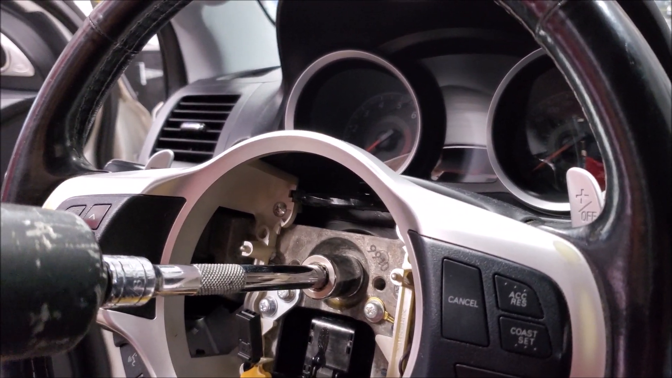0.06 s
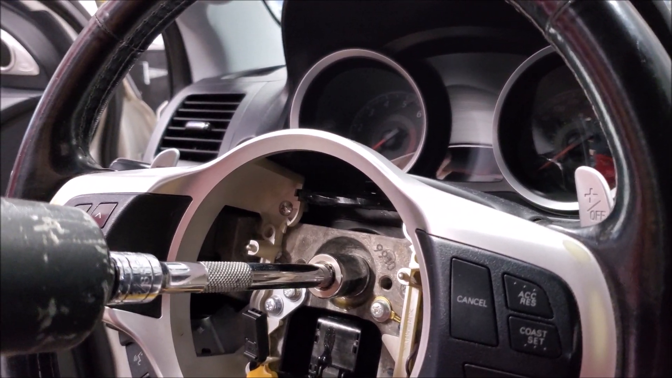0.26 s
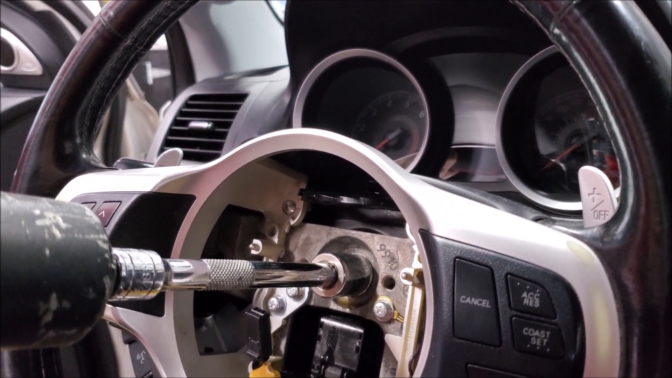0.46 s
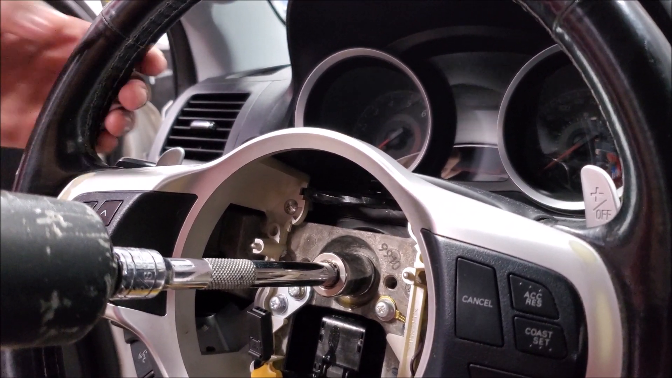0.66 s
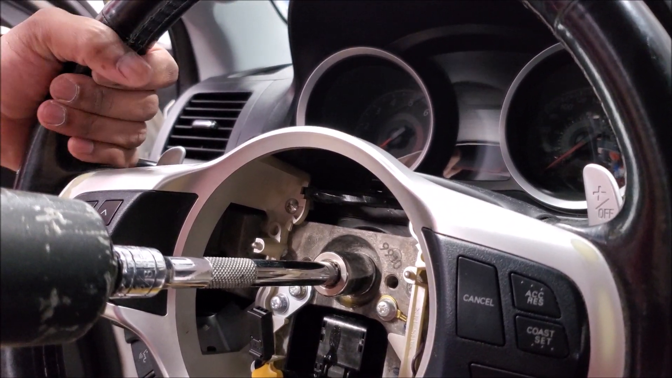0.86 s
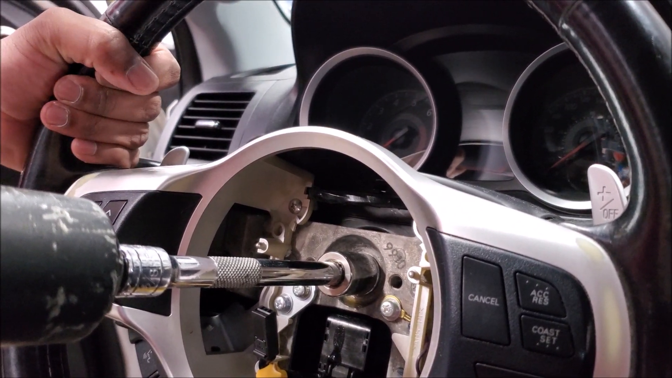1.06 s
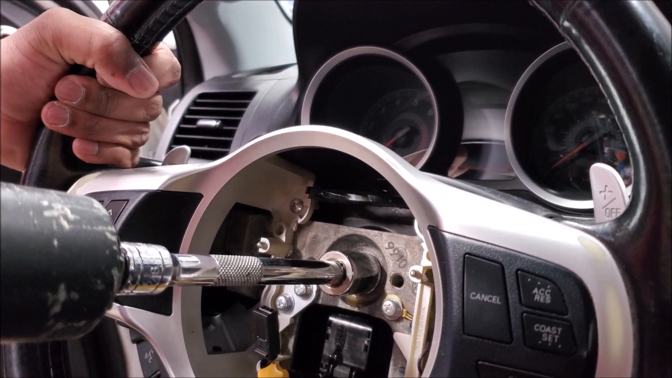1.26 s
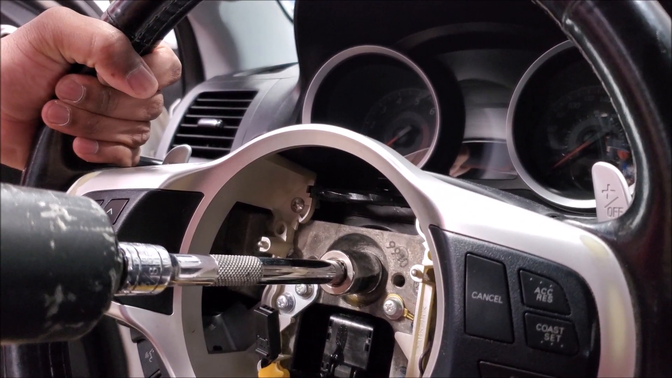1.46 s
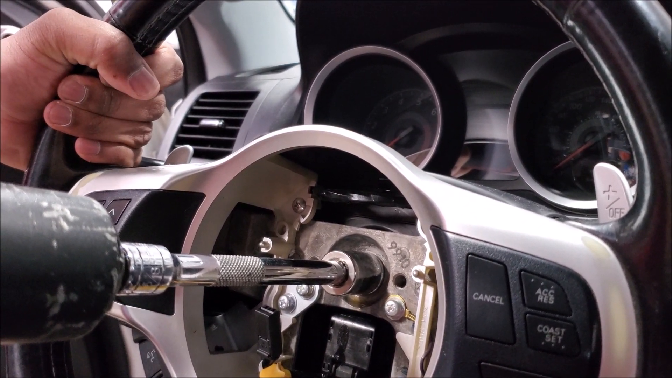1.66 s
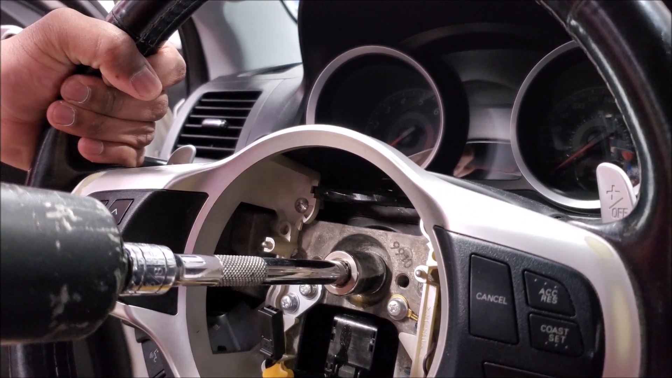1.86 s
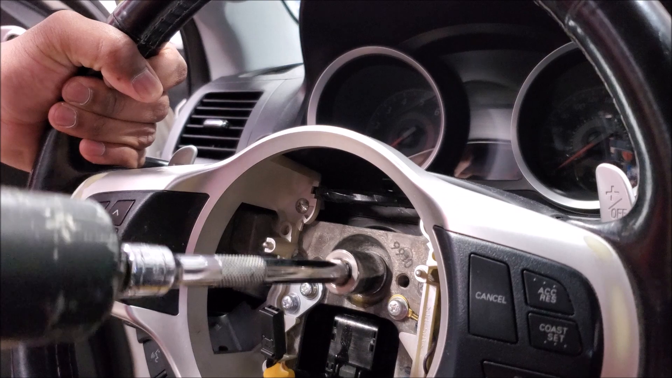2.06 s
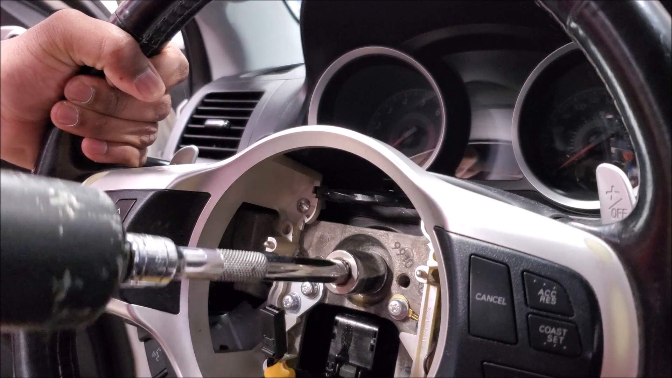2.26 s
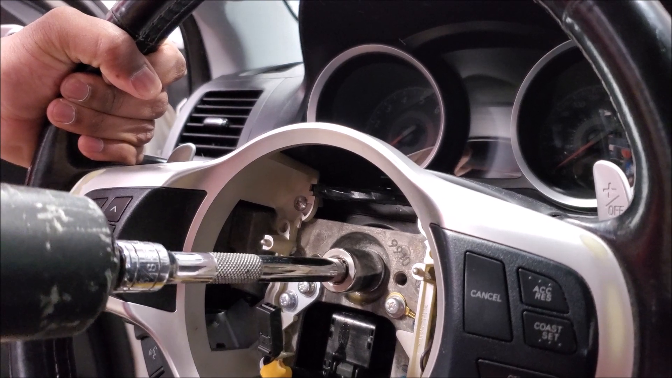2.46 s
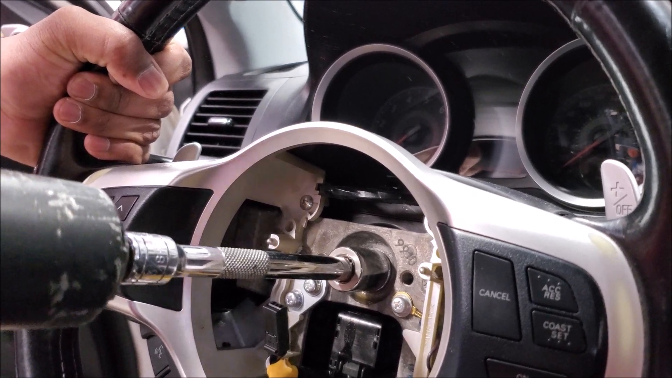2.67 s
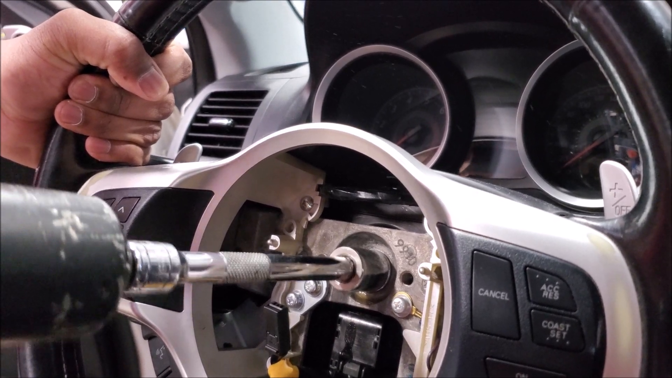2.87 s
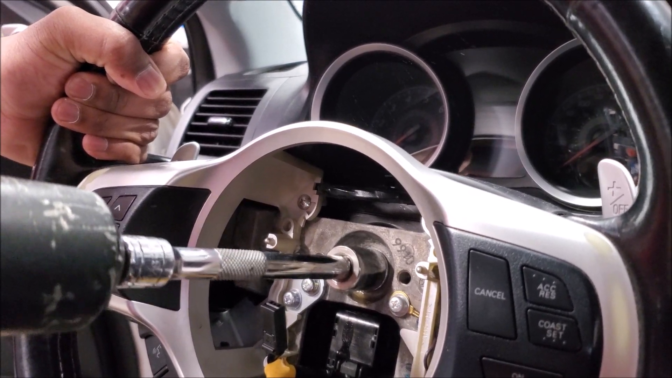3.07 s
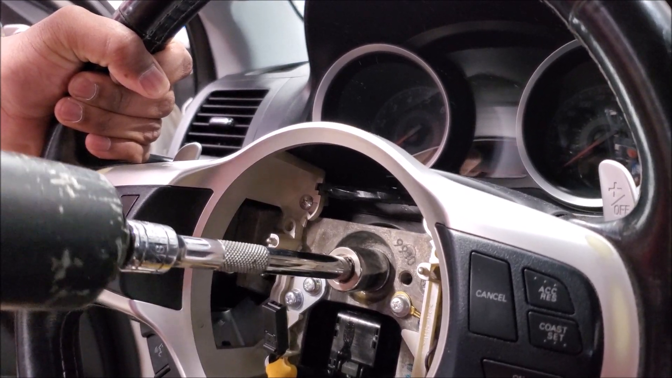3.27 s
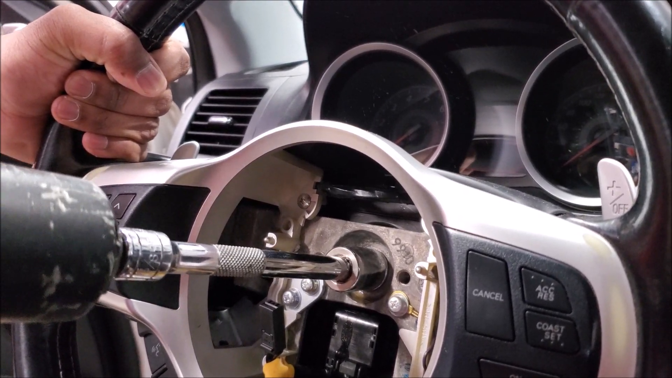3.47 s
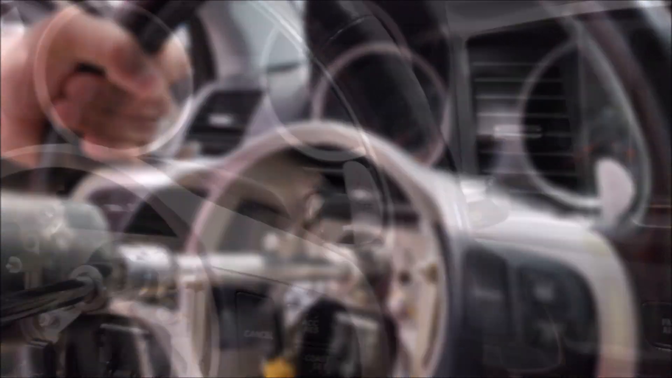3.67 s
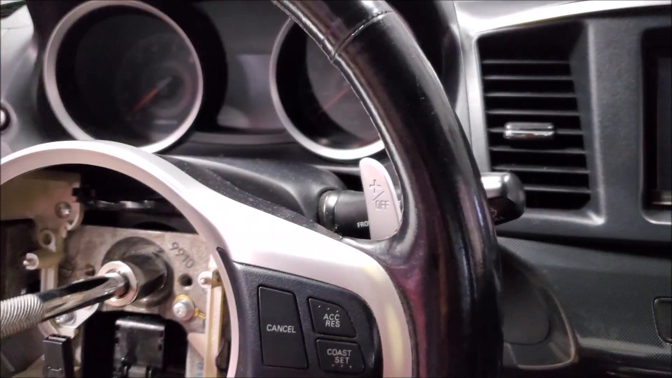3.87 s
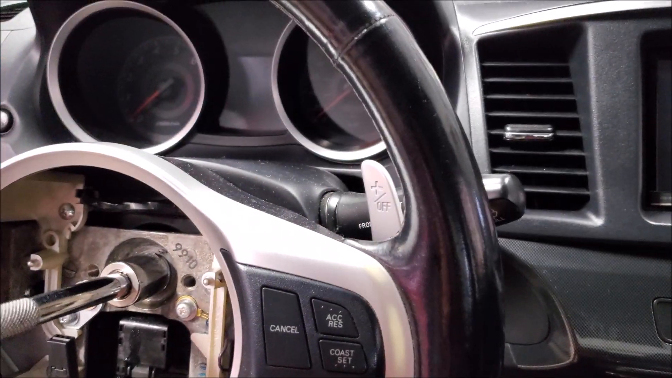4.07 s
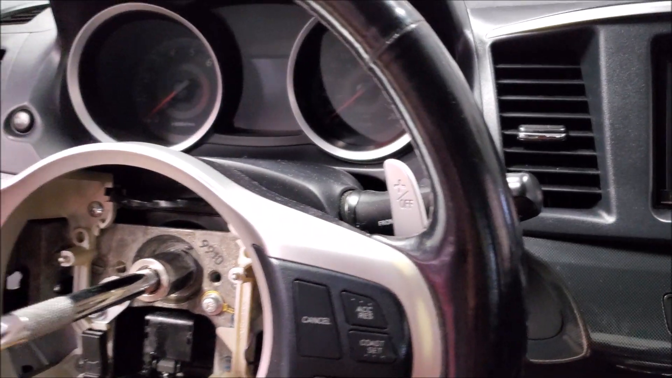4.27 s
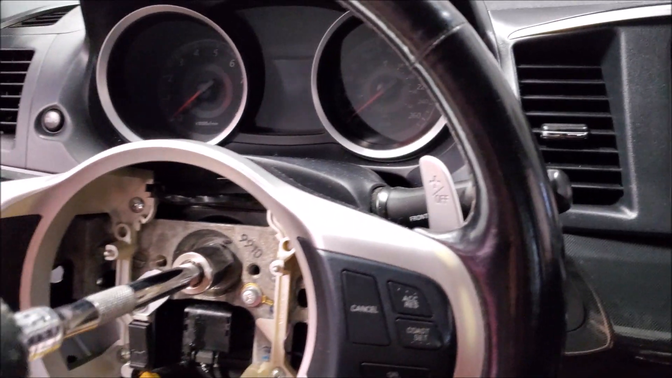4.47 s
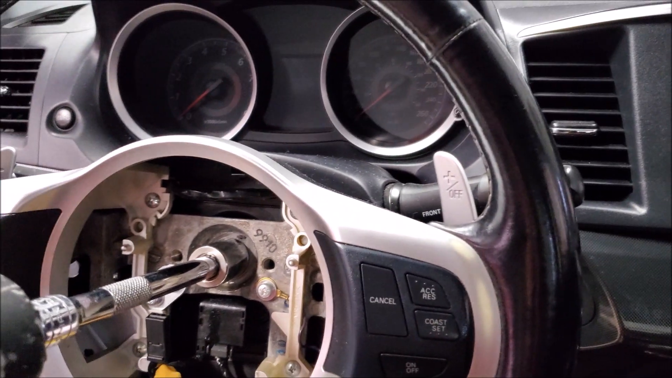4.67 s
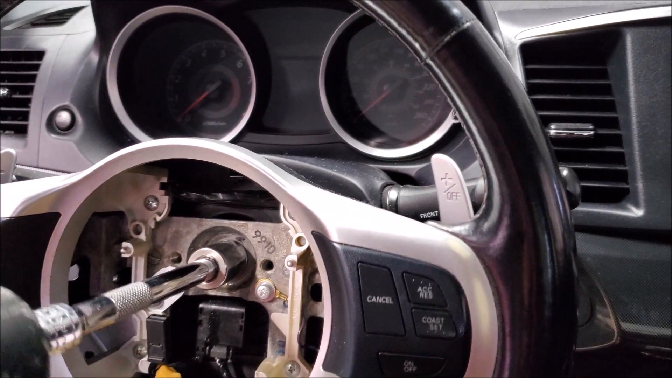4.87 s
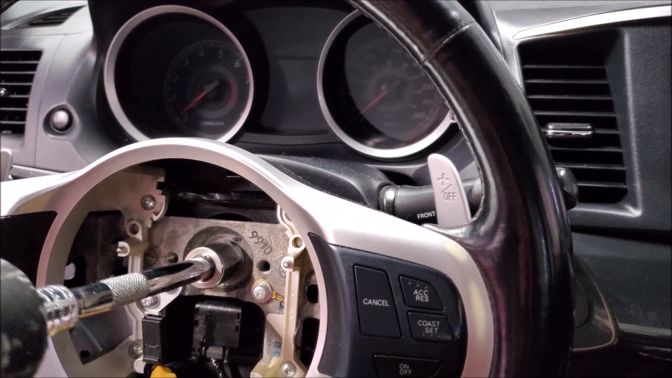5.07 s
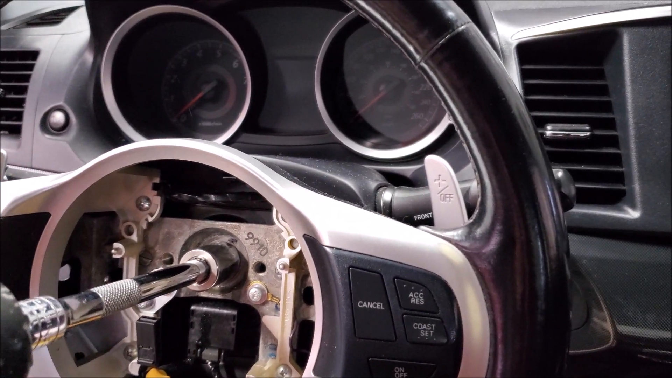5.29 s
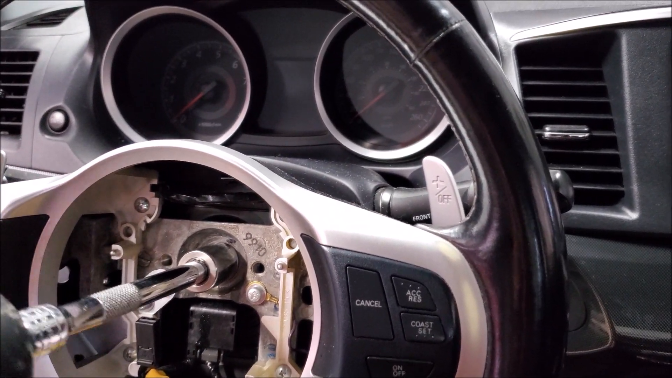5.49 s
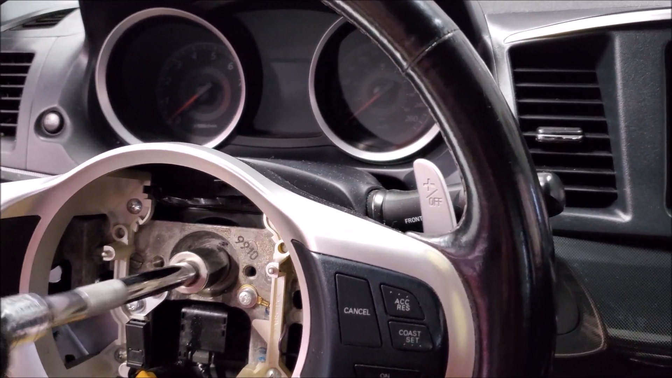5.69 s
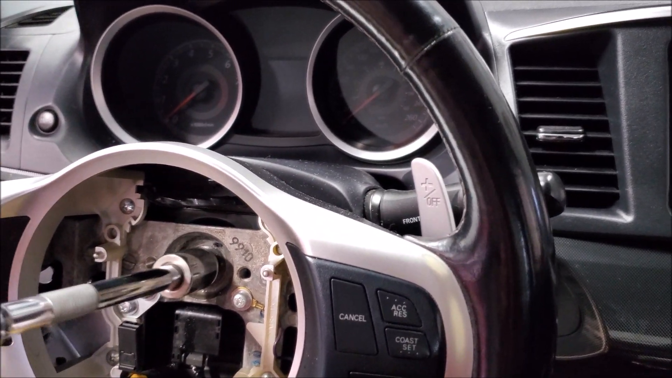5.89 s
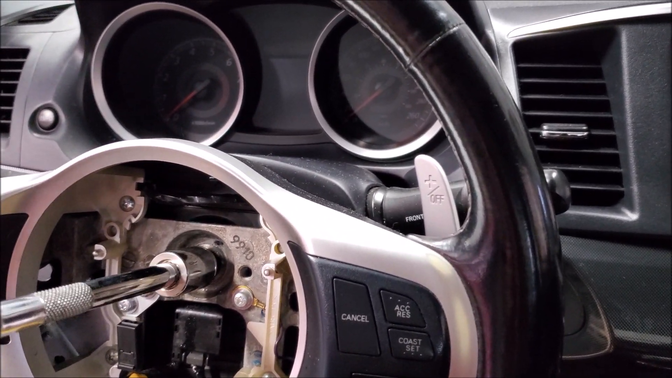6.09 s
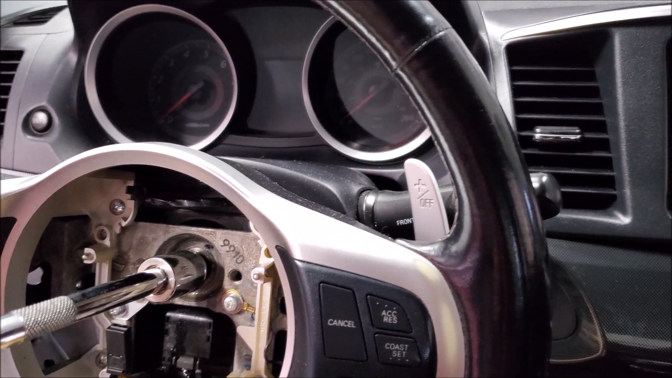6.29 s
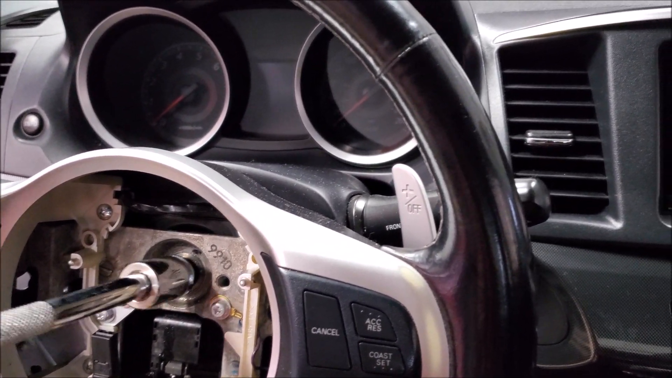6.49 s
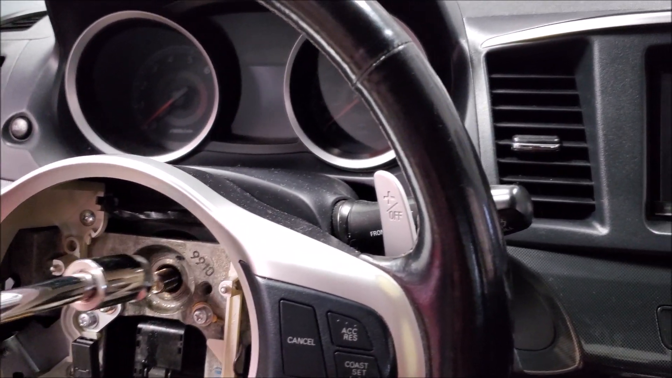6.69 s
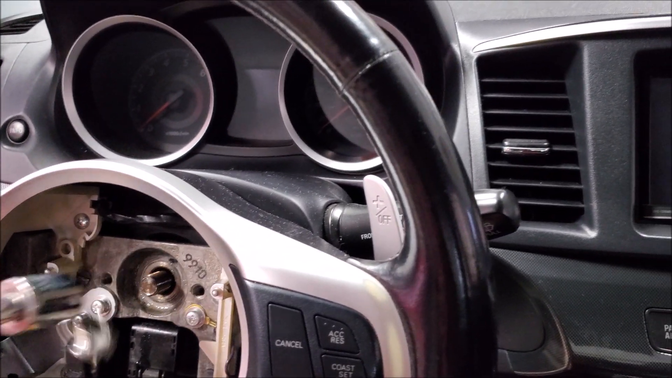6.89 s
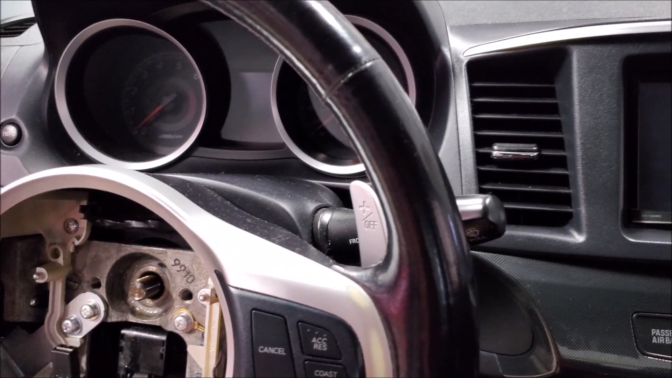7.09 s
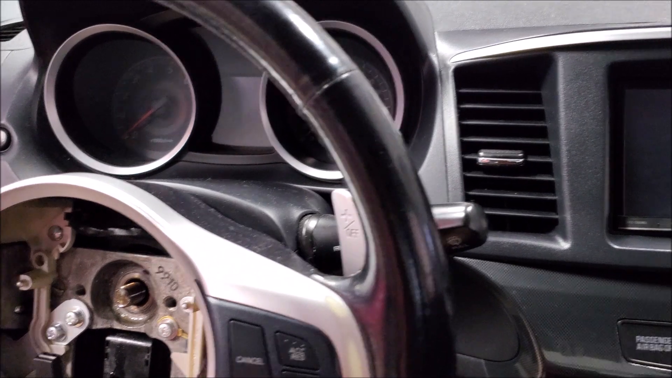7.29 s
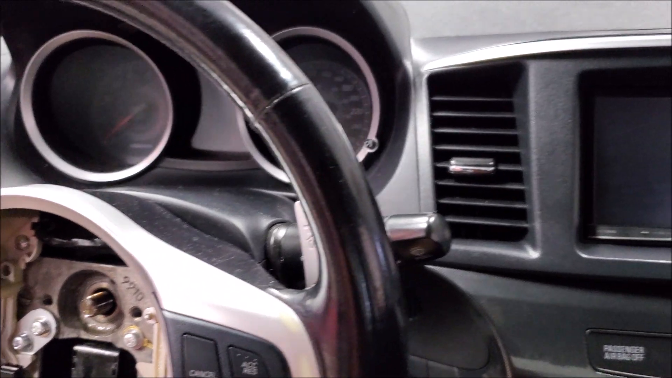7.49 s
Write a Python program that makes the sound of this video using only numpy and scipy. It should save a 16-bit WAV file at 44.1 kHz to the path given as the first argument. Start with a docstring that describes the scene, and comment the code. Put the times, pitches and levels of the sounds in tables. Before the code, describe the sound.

For the first two seconds it is quiet inside a car in a garage: a low hum near 59 hertz throbs about nine times a second, with soft thuds, small taps around 0.2 to 0.65 s and dry hand strokes on leather until 1 s. At 2.1 s an impact wrench bursts in, loud, harsh and close, hammering steel about 44 times a second for 0.2 s. A longer burst runs 2.75-3.2 s, another 3.6-3.85 s, then the throbbing hum returns with faint taps. A very short burst comes at 4.9 s. The last starts at 5.5 s, hammers until 5.7 s, then the gears whir freely to 6.03 s and stop with a clink and low thud. Echo and faint wheel ringing follow bursts. Soft rubbing comes at 6.5 s, clinks and a faint scrape near 7 s, and heavy clunks at 7.3 and 7.5 s.

```python
"""Inside a car in a garage, close to the wheel, a two-port microphone hears an electric impact wrench hammer
a steering wheel nut in five bursts; in the last the nut spins free. Blows and gears are noise and cracks ringing
steel; hub, wheel and nut are decaying sines. A hand rubs (noise strokes) and taps (noise puffs) the wheel, the
socket scrapes off, tool and nut are put down. Behind lie garage echo, two throbbing hum tones and faint noise."""
import sys
import numpy as np
from scipy import signal
from scipy.fft import rfft, irfft
from scipy.io import wavfile
from scipy.ndimage import uniform_filter1d

SR = 44100
rng = np.random.default_rng(int(sys.argv[2]) if len(sys.argv) > 2 else 0)


def int16_out(signal):
    """Quantize to a 16-bit WAV file."""
    q = np.round(np.clip(np.atleast_2d(signal).T, -1, 1) * 32767)
    wavfile.write(sys.argv[1], SR, q.astype(np.int16))


def gain_from_db(level_db):
    """Turn a decibel level (scalar or array-like) into a linear amplitude factor."""
    decades = np.asarray(level_db, float) / 20
    return 10 ** decades


N = 332813
T = np.arange(N) / SR
HZ = np.fft.rfftfreq(8192, 1 / SR)  # grid for filter curves

# Broad colour of tool, socket and hub: f/Hz, relative level/dB
STEEL_COLOUR = [(150, -49), (250, -20.5), (528, -11), (618, -9.5), (761, -2), (922, -4), (1060, -1.5),
                (1980, -8), (2240, -2), (15200, -14.5), (16000, -34)]
# Resonances of the same steel: f/Hz, width/Hz, level/dB over the colour
STEEL_RESONANCES = [(740, 340, 7.3), (1100, 80, 1.3), (1351, 160, 11), (2190, 90, 5.3), (2450, 80, 4.5),
                    (3000, 100, 2.3), (3300, 370, 5.5), (3697, 92, 6.7), (4115, 370, 5), (4600, 160, 5.7),
                    (6440, 150, 1.4)]
# Low, middle and top paths into the steel, each a curve: f/Hz, relative level/dB
STEEL_BANDS = [
    [(1200, 0), (1900, -30)],
    [(1200, -30), (1600, 0), (9000, 0), (10500, -30)],
    [(7800, -30), (9000, 0)],
]
# Steady hammering: first t/s, last t/s, blows per second, blow level/dB before band trims, jaw click level/dB re blow
HAMMERING = [(2.1112, 2.283, 43.1, -10.5, -3.5), (2.7975, 3.22, 43.85, -10, -3.5),
             (3.6493, 3.818, 44.1, -9.5, -5), (4.9341, 5.012, 43.8, -11, -2),
             (5.5505, 5.604, 45.4, -12, 0.5), (5.617, 5.692, 46, -9, -10)]
# Uneven strikes while the hammer catches on and runs out: t/s, level/dB before band trims
UNEVEN_STRIKES = [(2.0775, -10.5), (2.091, -13), (2.0992, -14), (2.2907, -28), (2.7655, -10), (2.779, -9),
                  (3.2212, -15), (3.2276, -16.5), (3.6136, -14.5), (3.623, -8.5), (3.825, -15),
                  (3.8417, -11), (3.8723, -19.5), (4.8939, -16.5), (4.902, -8.5), (4.9146, -14),
                  (5.0183, -11.5), (5.0521, -15.5), (5.0745, -24.5), (5.5083, -22.5), (5.5186, -22.5),
                  (5.527, -12.5), (5.706, -15.5), (6.0422, -29), (6.0534, -28.5), (6.0618, -31),
                  (6.0734, -28), (6.09, -29.5)]
# Motor runs, the last the free spin: start t/s, full rattle t/s, end t/s, gear rattle level/dB before band trims,
# wheel shake level/dB before the kick
MOTOR_RUNS = [(2.064, 2.08, 2.273, -24.5, -41), (2.747, 2.77, 3.214, -25.5, -44),
              (3.599, 3.62, 3.84, -25.5, -42), (4.884, 4.9, 5.016, -26, -41), (5.484, 5.53, 5.7, -28, -41),
              (5.69, 5.712, 6.032, -29.3, -38.5)]
# Gear rattle running down: t/s after the end of a run, level/dB re held rattle
RATTLE_RUNDOWN = [(.02, -10.5), (.045, -23), (.085, -29), (.12, -45)]
# Colour of the wheel's shake: f/Hz, relative level/dB
SHAKE_COLOUR = [(35, -37), (60, -12.5), (129, -1.5), (210, -5), (327, -16.5), (360, -18.5), (500, -14),
                (650, -44), (1100, -120)]
# Modes of the hub: f/Hz, relative level/dB, t60/s
HUB_MODES = [(126, -13, 0.041), (179.7, -11.5, 0.094), (392.5, -16, 0.12), (528, -14, 0.15),
             (762.3, -5.5, 0.042), (867, -4.5, 0.094), (1068, -1.5, 0.057), (1270, -3, 0.071),
             (1540, -9.5, 0.08), (2190, -1, 0.052)]
# Long modes of wheel and column: f/Hz, t60/s, rise/s
WHEEL_MODES = [(161, 3.1, .05), (310, 0.46, .02), (409.2, 1.8, 0.026), (752, .6, 0.1), (926, 1.8, .04)]
# Ringing left when a burst ends: t/s, then one level/dB (before the soft rise) for each wheel mode
WHEEL_RINGS = [(2.301, -68, -54, -69, -36.5, -69), (3.248, -62.5, -43.5, -73, -62, -76),
               (3.88, -61.5, -52.5, -79.5, -47, -89), (5.08, -68, -50.5, -74, -32.5, -74.5),
               (6.13, -59, -76.5, -78, -82, -94)]
# Jolts of the wheel and set-down thuds: t/s, starting level/dB, f/Hz, t60/s
WHEEL_THUDS = [(0.202, -53.5, 212, 0.16), (.64, -52, 210, 0.25), (0.652, -43.5, 124, .2),
               (2.081, -25, 169, 0.059), (2.775, -39.5, 130, .08), (3.62, -40, 149.9, .08),
               (3.845, -19, 125, 0.091), (3.912, -26, 71, 0.21), (4.1, -54, 133.5, 1.4),
               (4.906, -19.5, 139.9, .08), (5.983, -25.5, 120, .12), (6.04, -31, 65, .3),
               (7.288, -19.5, 120, 0.044), (7.288, -28.5, 281, 0.045), (7.299, -32.5, 73.5, 0.31),
               (7.521, -23, 140, 0.053), (7.521, -33, 348, 0.049)]
# Taps and clinks: t/s, level/dB before trim, ring centre f/Hz, dull path level/dB re ring, bright path level/dB re ring
TAP_EVENTS = [(0.227, -57.5, 1770, 4, -15), (0.2623, -55.5, 4640, -6, -10), (0.4953, -50, 3160, -25, -6),
              (0.517, -47.5, 2350, -12.5, -6), (1.1094, -71, 1500, -6, -15), (1.9785, -53, 3600, -19, -5),
              (4.1, -54.5, 4800, -2.5, -9), (4.1544, -70, 2400, 15, -12), (4.3807, -80, 1525, 27.5, -10),
              (4.7494, -80, 1750, 26, -10), (6.1054, -32, 2157, -16, -27), (6.1244, -43, 2190, -22, -26),
              (6.445, -67, 3545, -10, -23), (6.5889, -66, 3050, -15, -21), (6.8694, -67, 3040, -19, -30),
              (6.9316, -44, 2830, -19, -3.5), (6.9566, -37.5, 3610, -9, -2.5),
              (7.0324, -21.5, 1800, -4.5, -19.5), (7.2876, -29.5, 1525, 6, -22),
              (7.5215, -45, 1650, 8, -28)]
# Nut and socket touching down: t/s, level/dB added to that of each mode
CLANK_EVENTS = [(7.0324, -29), (7.2873, -41), (7.5215, -47.5)]
# Modes of nut and socket: f/Hz, relative level/dB, t60/s
NUT_MODES = [(673, -17.5, 0.061), (864, -3, 0.023), (1222, 0.5, 0.033), (2190, -11, 0.078),
             (2998, -20, 0.09), (3316, -21, 0.079), (3840, -16, 0.049), (4100, -24, 0.053),
             (4700, -31, 0.052)]
# Path of the socket's scraping note: t/s, f/Hz, level/dB
SLIDE_PATH = [(6.94, 700, -75), (6.97, 705, -62), (7.05, 706, -66), (7.15, 481, -66.5), (7.17, 441, -71)]
# Strokes of a hand on the wheel: start t/s, hold/s, hiss level/dB, scuff level/dB
HAND_STROKES = [(0.264, .09, -73.5, -73), (.5, .06, -70, -66), (.77, 0.048, -62.5, -62),
                (0.836, 0.072, -62, -68), (.97, 0.055, -75, -82), (6.52, 0.036, -82, -67.5),
                (6.98, 0.17, -83, -63.5), (7.19, 0.087, -59.5, -71), (7.308, .03, -72.5, -65)]
# Decay of the garage: f/Hz, t60/s
GARAGE_DECAY = [(250, 0.69), (660, 0.7), (1740, 0.59), (4590, 0.73), (8000, .56), (12100, 0.4)]
# Level of the garage echo, cut short after the third burst: t/s, level/dB
ECHO_LEVEL = [(0, -21.5), (3.925, -21), (3.932, -36), (4.05, -51), (4.8, -19.5), (5.7, -18.5), (6.1, -28.5),
              (7.55, -27)]
# Room levels: t/s, upper hum tone level/dB, lower hum tone level/dB, noise level/dB
ROOM_LEVELS = [(0.05, -47, -51, -64.5), (0.3, -43, -48.5, -61), (0.8, -46, -44, -62), (1.5, -45, -55, -64),
               (2.05, -47.5, -59.5, -64), (2.3, -62.5, -60, -60), (2.6, -63, -75, -67),
               (3.25, -57.5, -58, -59.5), (3.55, -62, -71, -67), (3.75, -44.5, -53, -61),
               (3.95, -41.5, -50, -58), (4.25, -47, -46.5, -63), (4.8, -48.5, -55, -65.5),
               (5.0, -62, -67.5, -57.5), (5.45, -64.5, -69.5, -66), (6.0, -46, -71, -56),
               (6.25, -60, -68, -67), (6.55, -66, -84, -78), (6.85, -63.5, -76, -80.5),
               (7.05, -58, -69.5, -63), (7.5, -53, -62, -60)]
# Beating of the two hum tones: from t/s, a throb top at t/s, throbs per second
HUM_THROBS = [(0, 0.663, 9.1), (3.754, 4.384, 9.1)]
# Colour of the room noise: f/Hz, relative level/dB
NOISE_COLOUR = [(30, -30.5), (45, -10), (90, -2), (142, -10.5), (170, -18.5), (200, -10.5), (290, -10),
                (400, -27.5), (1320, -34), (4900, -41), (6200, -41.5), (6750, -30.5), (7300, -44),
                (16000, -44.5)]
# Likeness of the room noise at the two ports: f/Hz, likeness (0 to 1)
PORT_LIKENESS = [(60, 1), (300, 0.054), (700, 0.37), (1400, 0.086), (16000, 0.13)]
# Colour of the far wash: f/Hz, relative level/dB
DISTANT_COLOUR = [(350, -24.5), (600, -5), (1000, 0.5), (1500, -4), (2500, -20), (5000, -40)]

CRACK_LAG = 30  # samples from the start of the clatter to the crack
# The jaws meet a moment before each blow, weaker and thinner
JAW_LEAD_S, JAW_SPREAD_S, BLOW_SPREAD_S = .0062, .0012, .0008
SPREAD_DB, COLOUR_SPREAD_DB = 1.2, 2.5
BLOW_COLOUR, JAW_COLOUR = (-8, -11), (-15, -10.5)  # low and top level/dB re blow, before band trims
HUB_DB = -19  # added to blow level and mode level
WAKE_S, WAKE_DB, FULL_RISE_S = 0.0098, -12, 0.011  # the motor wakes softly, then rises to full rattle
KICK_DB, KICK_S, SHAKE_FALL_DB_PER_S = 5, .05, 130  # the shake peaks as the rattle reaches full
TAP_T60_S = .058
STROKE_RISE_DB_PER_S, STROKE_FALL_DB_PER_S = 400, 260
HUM_HZ = 59.1  # upper tone, about which it wanders
DISTANT_DB, DISTANT_END_S = -80.5, 2.1


def evened(x):
    """Scale to an rms of one."""
    return x / np.sqrt(np.mean(x ** 2) + 1e-20)


def read(points, hz):
    """Read a curve over log frequency."""
    f, value = np.transpose(points)
    return np.interp(np.log(hz + 1), np.log(f + 1), value)


def over_time(table):
    """Read every column of a table along the time axis, leading with time."""
    columns = np.transpose(table)
    return [np.interp(T, columns[0], column) for column in columns]


def causal(db):
    """Minimum-phase impulse response of energy 1 with this dB curve: no ring before the start."""
    log_gain = np.log(gain_from_db(np.maximum(db - db.max(), -100)))
    circle = np.r_[log_gain, log_gain[-2:0:-1]]
    taps = np.fft.ifft(np.exp(np.conj(signal.hilbert(circle)))).real[:2048]
    return taps / np.linalg.norm(taps)


def through(x, ir):
    """Send both ports through one impulse response."""
    return signal.oaconvolve(x, ir[None])[:, :N]


def alike(a, b, likeness):
    """Mix two independent signals into a port pair with a given likeness."""
    same = np.clip(likeness, 0, 1)
    return np.array([a, same * a + np.sqrt(1 - same ** 2) * b])


def pair(likeness):
    """White noise for the two ports with a given likeness."""
    return alike(*rng.standard_normal((2, N)), likeness)


def modes(table, t):
    """Sum of sines, each dying at its own speed, as a struck solid rings."""
    return sum(gain_from_db(db - 60 * t / t60) * np.sin(2 * np.pi * hz * t) for hz, db, t60 in table)


def wrench():
    """Each blow is a sharp crack inside a short clatter; the gears rattle in between."""
    s, db, low_db, top_db = blows()
    gear_gain, shake_gain = motor()
    t = np.arange(3000) / SR
    left = gain_from_db([[1.6], [-1.6]])  # stronger at the left port
    luck = rng.standard_normal((len(s), 3)).T
    pan_db = 2.5 * luck[0] * [[1], [-1]]  # each blow radiates a little differently
    rattle = gear_teeth()
    drives, cracks = [], []
    # low, middle, top: blow dB, gears dB, clatter t60/s, clatter trim dB, crack trim dB
    for rel_db, gears_db, t60, trim_db, crack_db in (
            (low_db, -9, .025, -2.5, 9), (-1, 1.5, 0.0158, 4, 5.5), (top_db, -4.5, .016, 3, 4.5)):
        train = np.zeros((2, N))
        train[:, (s * SR).astype(int)] = left * gain_from_db(db + rel_db + pan_db) * np.sign(luck[1:])
        # power of one clatter: quick rise, fast decay and a weak slower one
        decay = gain_from_db(-120 * t / t60) + 0.048 * gain_from_db(-120 * t / 0.081)
        shape = (1 - np.exp(-t / 0.00097)) * decay
        clatter = gain_from_db(2 * trim_db) * through(train ** 2, shape)
        gears = left * gear_gain * gain_from_db(gears_db)
        drives.append(np.sqrt(abs(clatter) + gears ** 2 * rattle))
        cracks.append(np.roll(train, shift=CRACK_LAG, axis=1) * gain_from_db(crack_db))
    shake = through(pair(0.76), causal(read(SHAKE_COLOUR, HZ))) * shake_gain
    return steel(drives, cracks) + shake + hammer_beat() * gain_from_db([[1.5], [-1.5]])


def turns_of_hammer():
    """Time, blow level and jaw level of each turn: even spacing within each steady stretch."""
    return np.transpose([(s, db, db + jaw_db) for first, last, rate, db, jaw_db in HAMMERING
                         for s in np.arange(first, last, 1 / rate)])


def blows():
    """Rows of time, level, low and top level: blows, jaw clicks and uneven strikes, with small random spreads."""
    s, db, jaw_db = turns_of_hammer()
    early, late, *sizes = rng.standard_normal((len(s), 4)).T
    struck = np.c_[s + BLOW_SPREAD_S * late - CRACK_LAG / SR, db + SPREAD_DB * sizes[0]]
    jaws = np.c_[s - JAW_LEAD_S + JAW_SPREAD_S * early, jaw_db + SPREAD_DB * sizes[1]]
    colour = np.r_[[BLOW_COLOUR] * len(s), [JAW_COLOUR] * len(s), [BLOW_COLOUR] * len(UNEVEN_STRIKES)]
    colour = colour + COLOUR_SPREAD_DB * rng.standard_normal(colour.shape)
    return np.c_[np.r_[struck, jaws, UNEVEN_STRIKES], colour].T


def gear_teeth():
    """Power of teeth clicking unevenly: random clicks of random size over a steady floor."""
    sizes = gain_from_db(2 * 2.1 * rng.exponential(1, N).clip(0, 4))
    clicks = (rng.random(N) < 600 / SR) * sizes  # about 600 a second
    return .5 + .5 * uniform_filter1d(clicks, 60) / clicks.mean()


def motor():
    """Gains of gear rattle and wheel shake: wake, rise to full, hold, run down; runs add in power."""
    after_s, after_db = np.transpose(RATTLE_RUNDOWN)
    rattle, shake = np.zeros((2, N))
    for start, full, end, rattle_db, shake_db in MOTOR_RUNS:
        awake, risen = start + WAKE_S, full + FULL_RISE_S
        s = np.r_[start, awake, max(full, awake), risen, end, end + after_s]
        course_db = np.interp(T, s, np.r_[-44, WAKE_DB, WAKE_DB, 0, 0, after_db], -200, -200)
        rattle += gain_from_db(2 * (rattle_db + course_db))
        kick_db = np.interp(T, [start, risen, risen + KICK_S], [-24, KICK_DB, 0], -200)
        fall_db = SHAKE_FALL_DB_PER_S * np.maximum(T - end, 0)
        shake += gain_from_db(2 * (shake_db + kick_db - fall_db))
    return np.sqrt(rattle), np.sqrt(shake)


def steel(drives, cracks):
    """Low, middle and top drives (single cracks plus noise under an envelope) ring the steel's resonances."""
    db = read(STEEL_COLOUR, HZ)
    for f, width, peak_db in STEEL_RESONANCES:
        db = db + peak_db / (1 + (2 * (HZ - f) / width) ** 2)
    out = np.zeros((2, N))
    for drive, crack, band, likeness in zip(drives, cracks, STEEL_BANDS, (.55, .05, 0)):
        out += through(crack + drive * pair(likeness), causal(db + read(band, HZ)))
    return out


def hammer_beat():
    """The hub's modes answer every steady turn of the hammer alike, so the beat has a pitch."""
    train = np.zeros(N)
    s, db, _ = turns_of_hammer()
    train[(s * SR).astype(int)] = gain_from_db(db + HUB_DB)
    return signal.oaconvolve(train, modes(HUB_MODES, np.arange(6000) / SR))[:N]


def wheel():
    """Long softly rising modes after each burst, and short low thuds, all decaying sines."""
    out = np.zeros(N)
    for s, *levels in WHEEL_RINGS:
        t = np.maximum(T - s, 0)
        for (hz, t60, rise), db in zip(WHEEL_MODES, levels):
            out += modes([(hz, db, t60)], t) * (1 - np.exp(-t / rise)) ** 2
    for s, db, hz, t60 in WHEEL_THUDS:
        out += modes([(hz, db, t60)], np.maximum(T - s, 0))
    return out


def taps():
    """Taps and clinks: a decaying puff of noise through a dull, a ringing and a bright path."""
    out, t = np.zeros((2, N + 9000)), np.arange(6000) / SR
    dull = causal(read([(300, -22), (600, -9), (780, 6.0), (1000, -6), (1300, -22), (2500, -53)], HZ))
    bright = causal(read([(8000, -26), (9500, -0.5), (16000, -8.5), (17000, -43)], HZ))
    for s, db, hz, low_db, top_db in TAP_EVENTS:
        puff_db = db - 4 - 60 * t / TAP_T60_S + np.array([[1.5], [-1.5]])  # stronger at the left port
        puff = rng.standard_normal((2, len(t))) * gain_from_db(puff_db)
        peak_db = 7 / (1 + ((HZ - hz) / 250) ** 2)
        slope_db = 6 * abs(np.log2((HZ + 1) / hz))
        ring = causal(read(STEEL_BANDS[1], HZ) + peak_db - slope_db)
        path = gain_from_db(low_db) * dull + ring + gain_from_db(top_db) * bright
        sound = signal.oaconvolve(puff, path[None])
        out[:, round(s * SR):][:, :sound.shape[1]] += sound
    return out[:, :N]


def clanks():
    """Modes of nut and socket ring briefly as they touch down, slightly stronger at the left port."""
    train = np.zeros(N)
    for s, db in CLANK_EVENTS:
        train[round(s * SR)] = gain_from_db(db)
    ring = modes(NUT_MODES, np.arange(6000) / SR)
    return signal.oaconvolve(train, ring)[:N] * gain_from_db([[1], [-1]])


def slide():
    """The socket scrapes off the nut: slow noise on a gliding carrier makes a falling hollow note."""
    s, hz, db = over_time(SLIDE_PATH)
    turn = np.exp(2j * np.pi * np.cumsum(hz) / SR)
    fuzz = uniform_filter1d(uniform_filter1d(rng.standard_normal((2, N)), 200), 200)
    fuzz = evened(fuzz)
    note = (turn * (fuzz[0] + 1j * fuzz[1])).real
    return gain_from_db(db) * note * (T > s[0]) * (T < s[-1])


def hand():
    """Skin on leather: grainy filtered noise, a hiss with a duller scuff below."""
    grain = evened(gain_from_db(1.8 * evened(uniform_filter1d(rng.standard_normal(N), 200))))
    hiss = causal(read([(3600, -30), (4800, 0), (9000, -3.5), (16000, -5), (17000, -40)], HZ))
    scuff = causal(read([(350, -5), (800, -10.5), (1700, -8), (2500, -1.5), (4000, -3.5),
                         (5500, -17), (8000, -39.5)], HZ))
    return (through(pair(0.088) * grain * strokes(2), hiss)
            + through(pair(0.088) * grain * strokes(3), scuff))


def strokes(column):
    """Gain of the strokes: quick rise, hold, slower fall; strokes add in power."""
    power = np.zeros(N)
    for row in HAND_STROKES:
        start, hold = row[:2]
        rise_db = STROKE_RISE_DB_PER_S * np.maximum(start - T, 0)
        fall_db = STROKE_FALL_DB_PER_S * np.maximum(T - start - hold, 0)
        power += gain_from_db(2 * (row[column] - rise_db - fall_db))
    return np.sqrt(power)


def garage(x):
    """Echo: a dense noise tail per port, each band dying at its own speed."""
    hz, t, z = signal.stft(rng.standard_normal((2, SR)), SR, nperseg=256)
    colour_db = read([(300, 5), (4000, -7), (8000, -7), (14000, -9)], hz)[:, None]
    decay_db = -60 * t / read(GARAGE_DECAY, hz)[:, None]
    tail = signal.istft(z * gain_from_db(decay_db + colour_db), SR, nperseg=256)[1]
    wet = signal.fftconvolve(x, tail / np.linalg.norm(tail[0]), axes=1)[:, :N]
    return wet * gain_from_db(over_time(ECHO_LEVEL)[1])


def room():
    """Two close, slowly wandering hum tones beat; faint coloured noise swells and sinks along its own curve."""
    _, upper_db, lower_db, noise_db = over_time(ROOM_LEVELS)
    beat = np.zeros(N)  # turns by which the lower tone falls behind
    for start, top, rate in HUM_THROBS:
        beat = np.where(T >= start, rate * (T - top), beat)
    wander = 0.077 * sum(np.sin(2 * np.pi * (f * T + rng.random())) for f in (.3, .7, 1.3, 2.1))
    turns = HUM_HZ * T + rng.random() + wander
    upper = gain_from_db(upper_db) * np.cos(2 * np.pi * turns)
    lower = gain_from_db(lower_db) * np.cos(2 * np.pi * (turns - beat))
    hum = np.sqrt(2) * (upper + lower)  # levels are rms
    hz = np.fft.rfftfreq(N, 1 / SR)
    spectra = alike(*rfft(rng.standard_normal((2, N))), read(PORT_LIKENESS, hz))
    noise = irfft(spectra * gain_from_db(read(NOISE_COLOUR, hz)), N)
    return hum + gain_from_db(noise_db) * evened(noise)


def late_right(x):
    """The left port is nearer the hum: the right hears it 18 samples later."""
    return np.array([x[0], np.roll(x[1], 18)])


def distant():
    """A faint far wash of filtered noise in the middle range, stopping as the first burst begins."""
    wash = through(pair(.2), causal(read(DISTANT_COLOUR, HZ)))
    return gain_from_db(DISTANT_DB) * (T < DISTANT_END_S) * wash


def scene():
    """Wrench, taps and clanks excite the garage; the other sources are heard without its echo."""
    near = wrench() + taps() + clanks()
    return near + garage(near) + wheel() + hand() + slide() + distant() + late_right(room())


def roll_off(x):
    """The treble ends steeply here."""
    return signal.sosfilt(signal.butter(12, 16990, fs=SR, output="sos"), x)


def record(dry):
    """The microphone signal clips hard at full scale, then loses what lies above 16 kHz."""
    edge = signal.firwin(255, 16000, window=("kaiser", 9), fs=SR)
    mix = signal.oaconvolve(np.clip(dry, -1, 1), edge[None], "same")
    return roll_off(mix)


dry = scene()
out = record(dry)
int16_out(out)
```